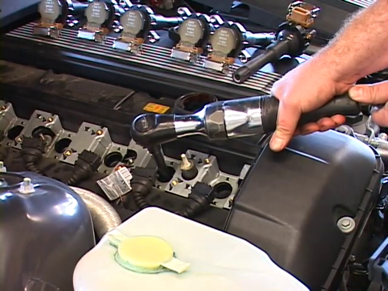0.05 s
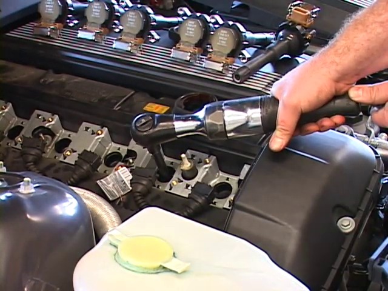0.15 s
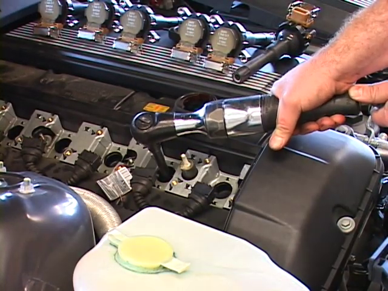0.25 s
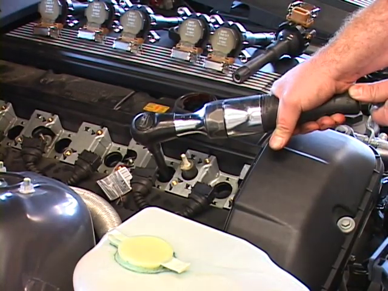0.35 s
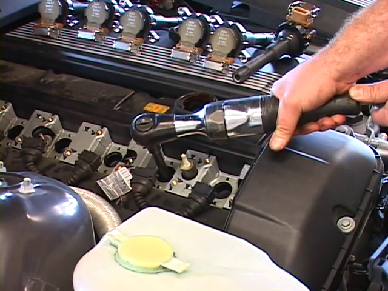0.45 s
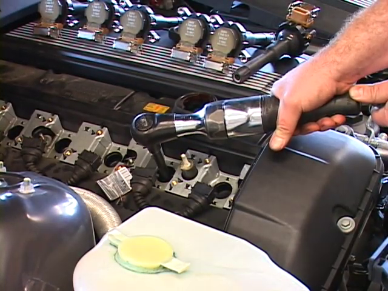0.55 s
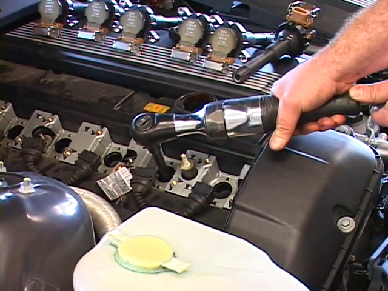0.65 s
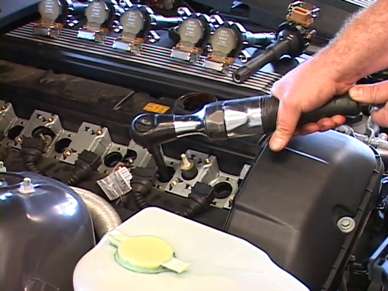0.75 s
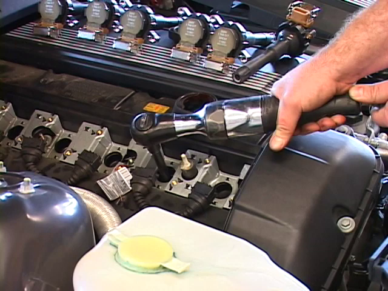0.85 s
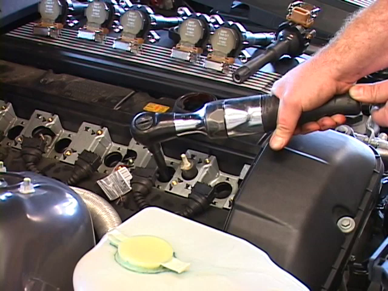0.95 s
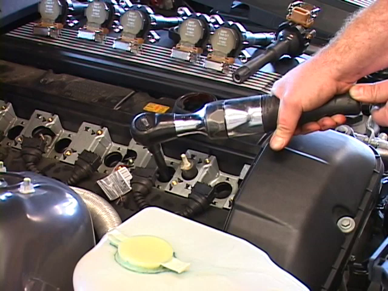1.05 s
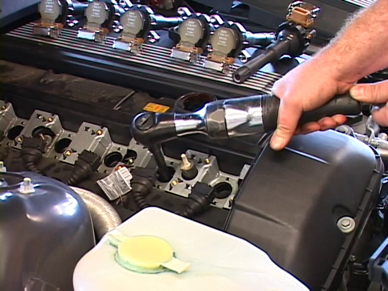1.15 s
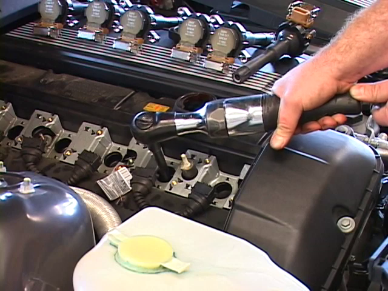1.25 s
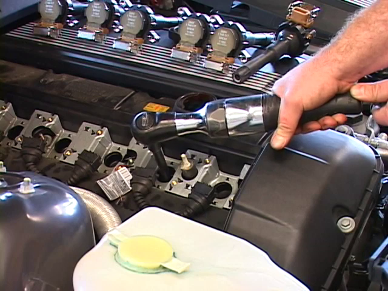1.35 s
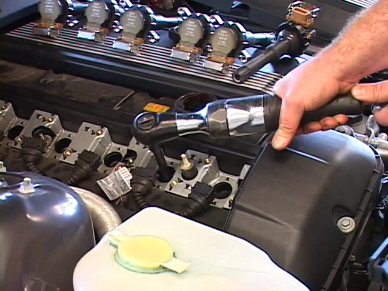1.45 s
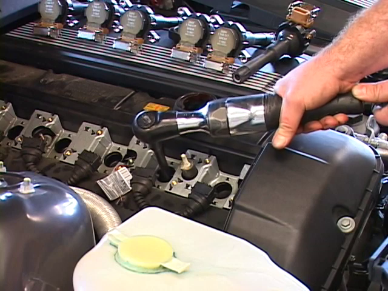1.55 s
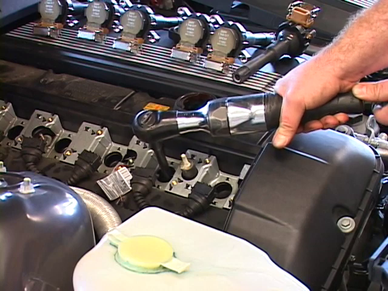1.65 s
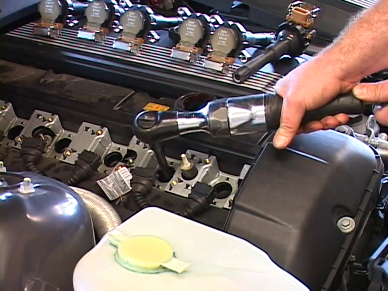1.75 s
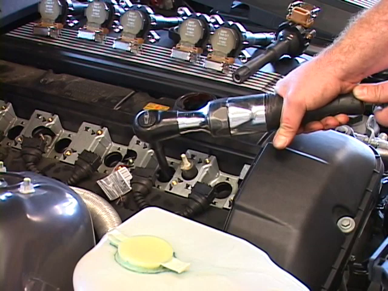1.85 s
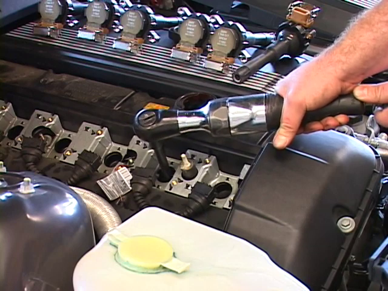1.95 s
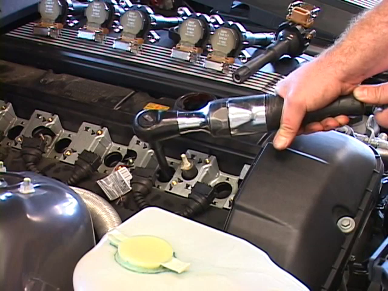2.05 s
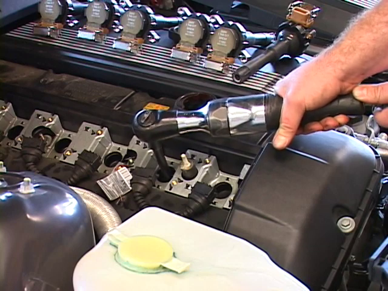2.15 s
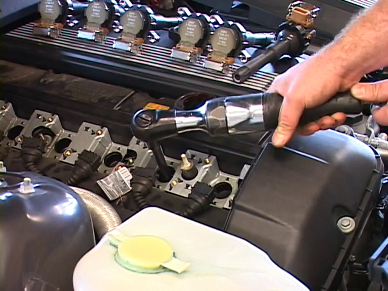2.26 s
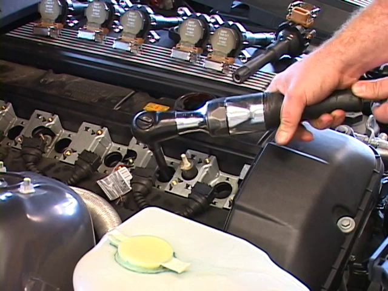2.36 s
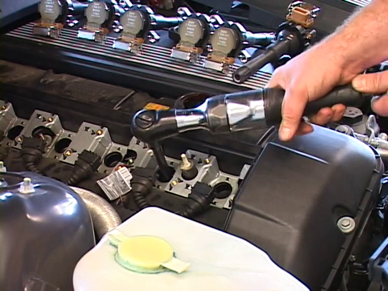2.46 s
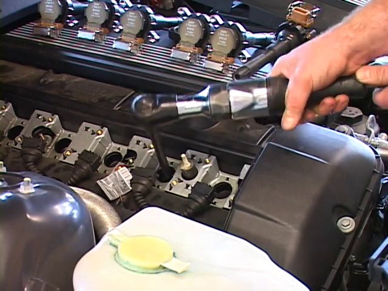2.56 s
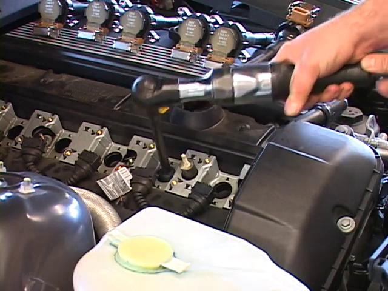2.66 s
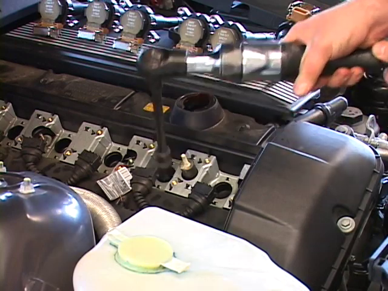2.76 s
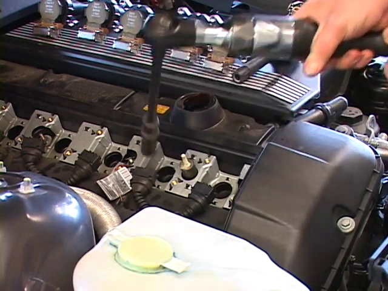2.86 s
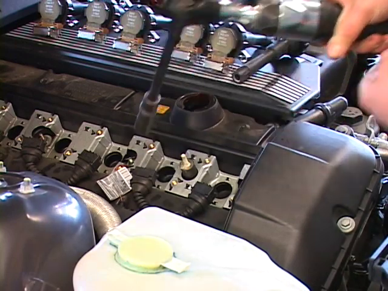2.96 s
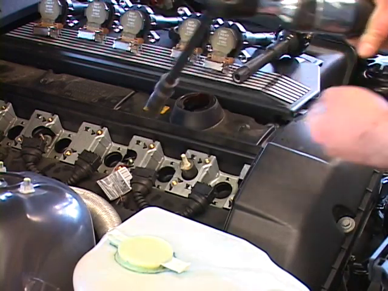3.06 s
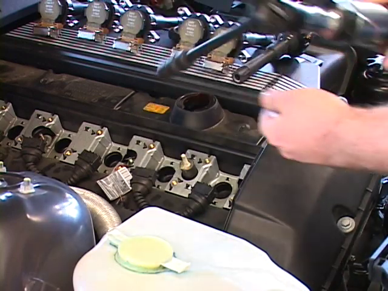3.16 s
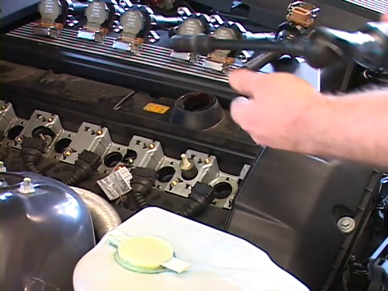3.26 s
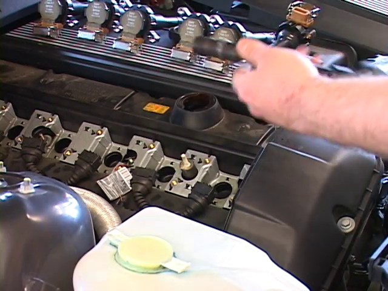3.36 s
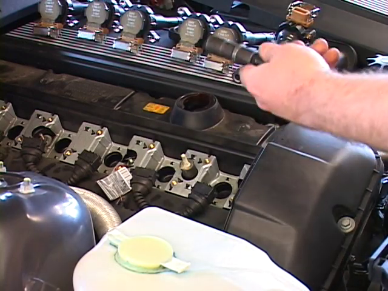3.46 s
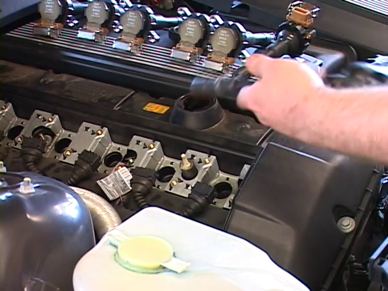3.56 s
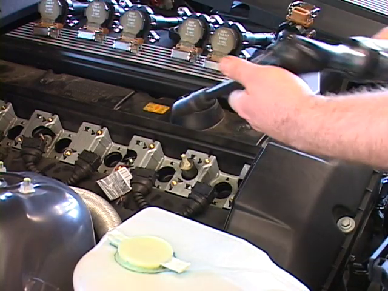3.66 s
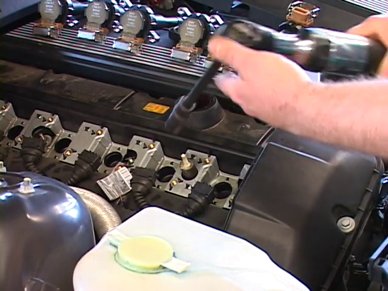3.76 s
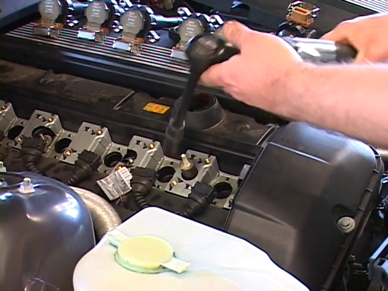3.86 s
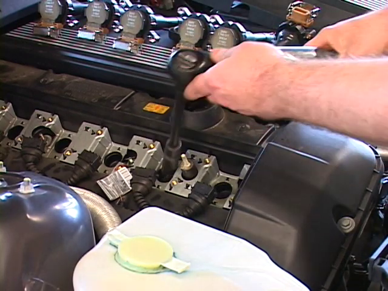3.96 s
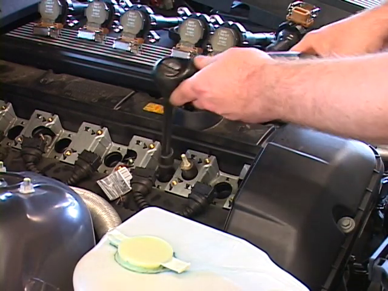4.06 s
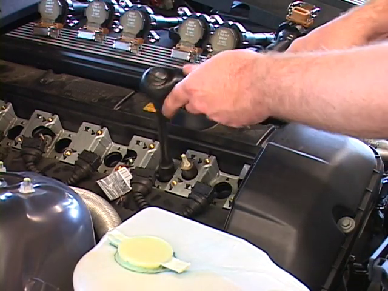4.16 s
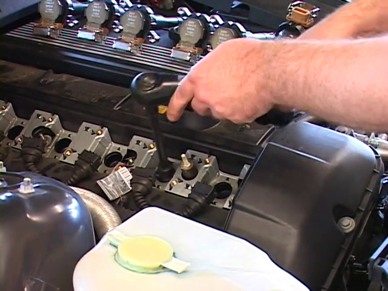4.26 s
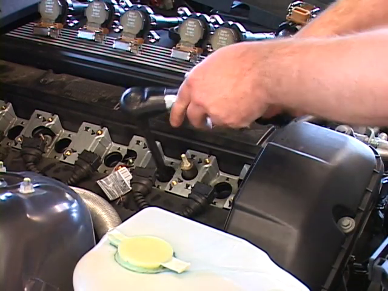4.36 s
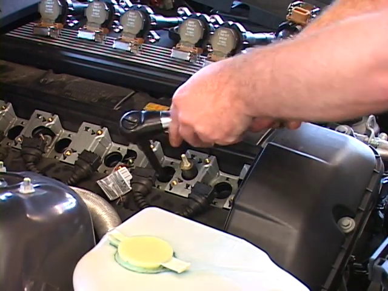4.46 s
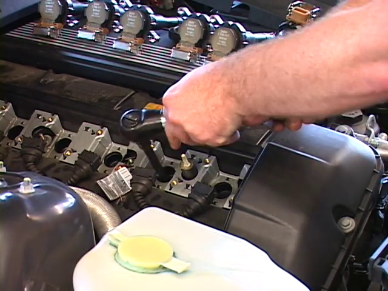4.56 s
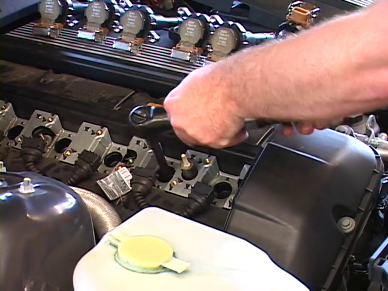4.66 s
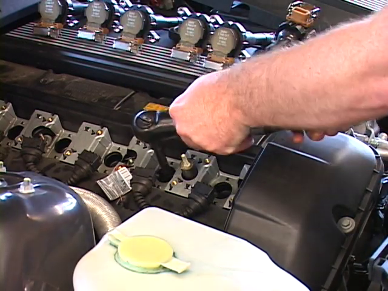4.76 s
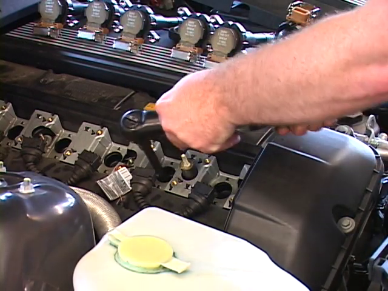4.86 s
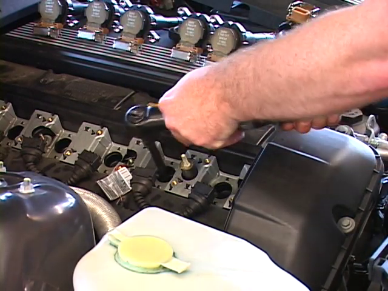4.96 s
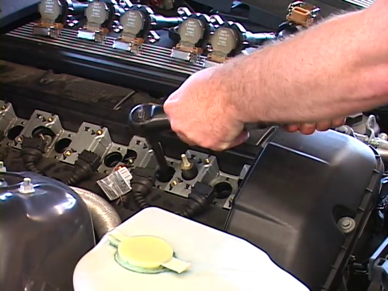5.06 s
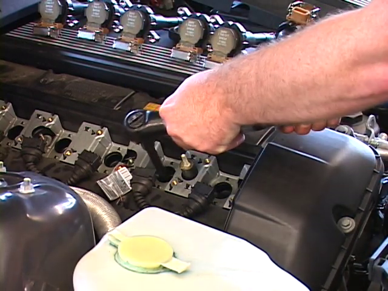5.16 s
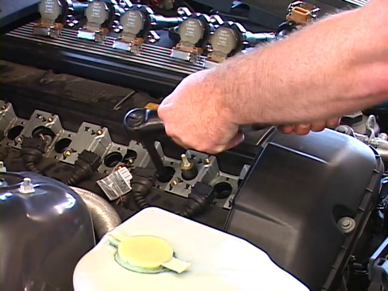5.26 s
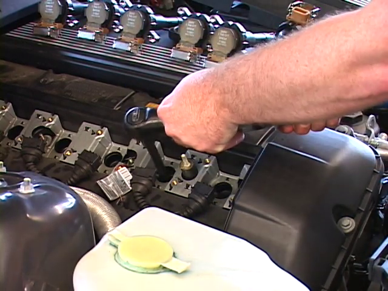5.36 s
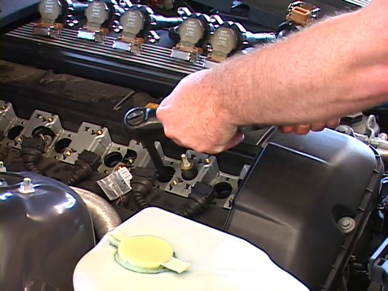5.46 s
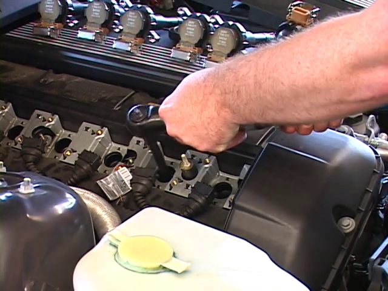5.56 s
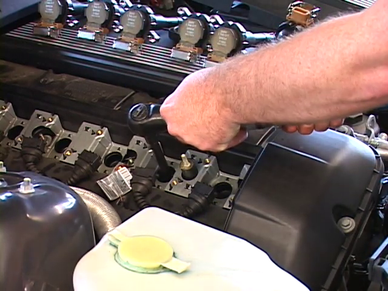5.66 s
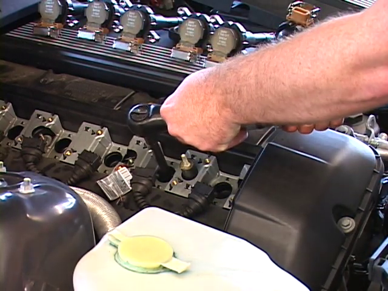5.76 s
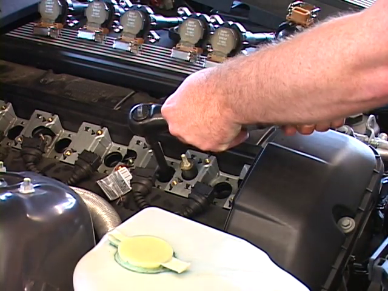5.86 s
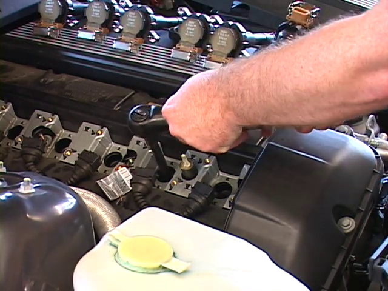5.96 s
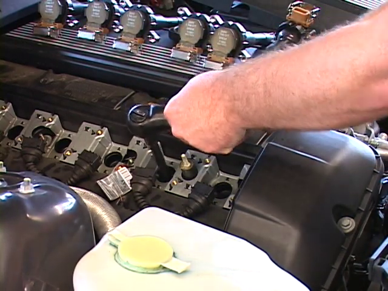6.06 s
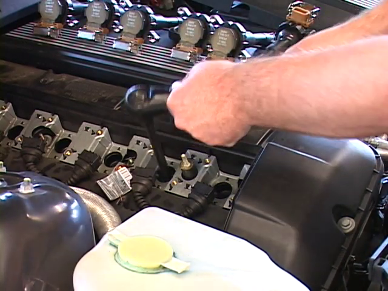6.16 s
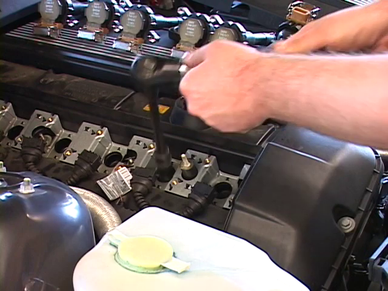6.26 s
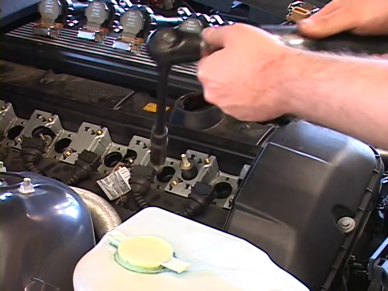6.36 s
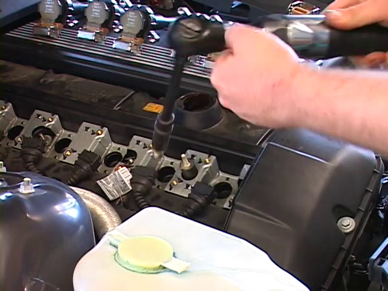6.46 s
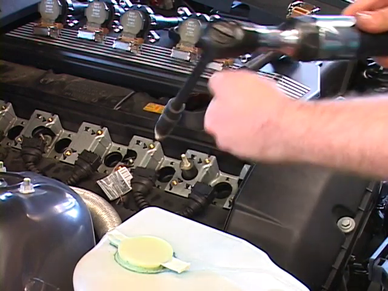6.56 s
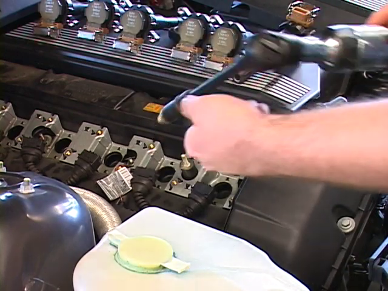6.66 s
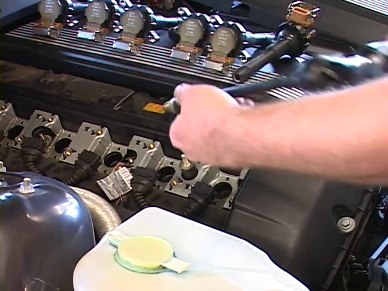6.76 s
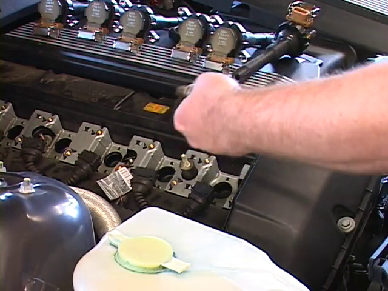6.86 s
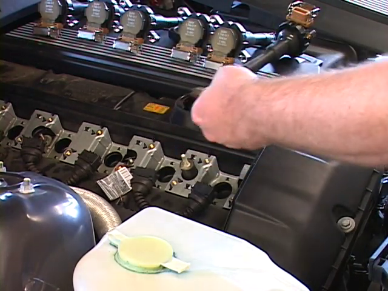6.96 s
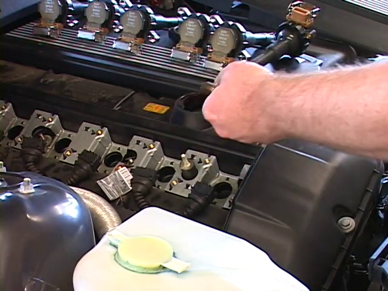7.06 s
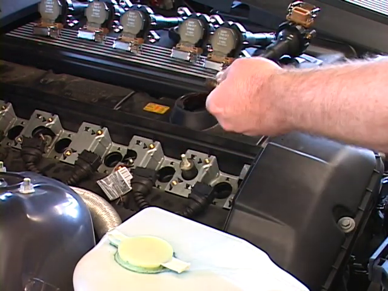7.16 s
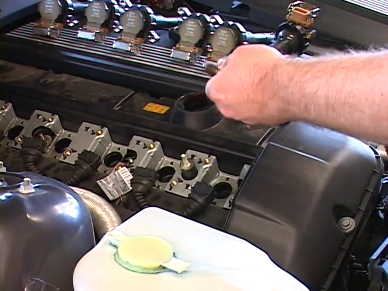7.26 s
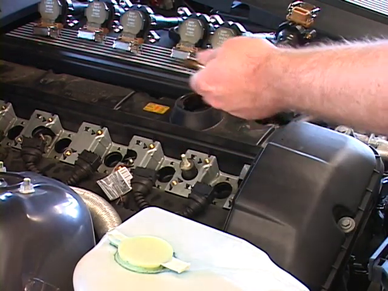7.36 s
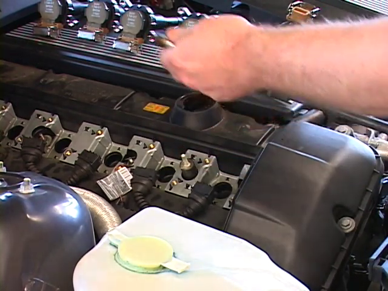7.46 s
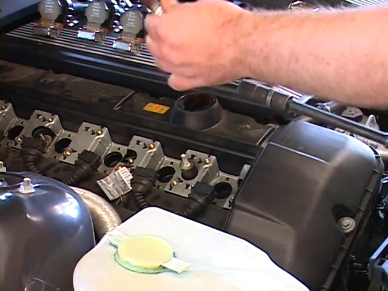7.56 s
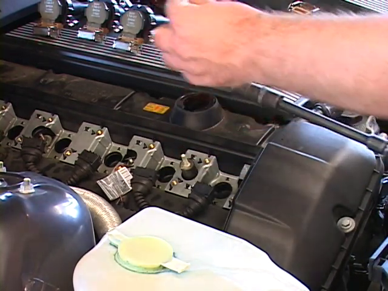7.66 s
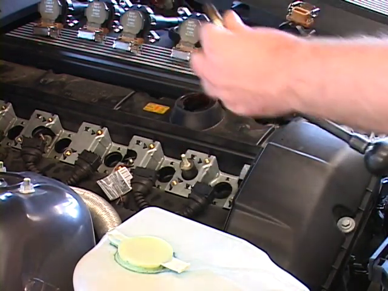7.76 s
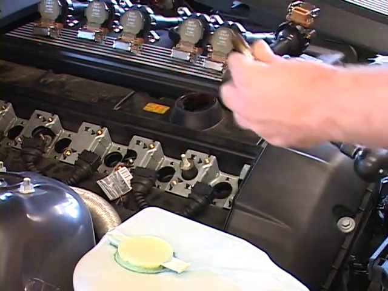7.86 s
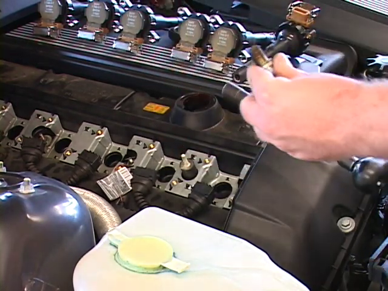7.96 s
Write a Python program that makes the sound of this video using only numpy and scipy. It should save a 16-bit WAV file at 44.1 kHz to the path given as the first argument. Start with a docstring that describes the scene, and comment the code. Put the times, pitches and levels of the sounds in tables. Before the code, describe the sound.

An air ratchet is running close by from the start, a high, slightly wavering whine over a loud hiss of exhaust air, with a short garage reverberation. At about 2.3 seconds it stops with a brief chug, its whine hanging in the room for a moment. Further off, a compressor hums up beneath it and, from about 1.5 seconds, pumps with a low, even pulse, about twelve beats a second, over a soft airy rush that lasts to the end. The steel socket clicks lightly twice just before 3 seconds, then several times between 4 and 4.5 seconds, with dull knocks near 4.4 and 4.9 as it seats. At 5 seconds the ratchet spins up again, its pitch overshooting and settling, and coasts down at about 6 seconds. A few metal clicks follow around 6.3 seconds and a faint one near 7.5, while the compressor keeps pulsing.

```python
"""Air ratchet on a spark plug

An air ratchet spins a spark plug out in two bursts: its vane motor whines over hissing exhaust, then
chugs as it coasts down. The steel socket clicks and knocks as it is handled. Further off in the garage
a compressor runs up and pumps about twelve times a second; gain control ducks it while the tool runs."""
import sys
import numpy as np
from scipy import signal
from scipy.fft import rfft, irfft, next_fast_len
from scipy.io import wavfile
from scipy.ndimage import uniform_filter1d, map_coordinates

SR = 44100
rng = np.random.default_rng(int(sys.argv[2]) if len(sys.argv) > 2 else 0)


def log_audio(samples):
    """Write samples as a 16-bit WAV file to the path given in sys.argv[1]."""
    # one column per channel
    frames = np.atleast_2d(samples).T
    # limit to full scale, then quantise
    limited = np.clip(frames, -1, 1)
    pcm = np.round(limited * 32767).astype(np.int16)
    wavfile.write(sys.argv[1], SR, pcm)


N = 353285
T = np.arange(N) / SR


def amp(db):
    """Decibels to gain."""
    return np.exp(np.asarray(db) * (np.log(10) / 20))


def unit(x):
    """Scale to rms 1."""
    return x / np.sqrt(np.mean(x ** 2) + 1e-20)


def pan(db):
    """Stereo gains that favour the left by db."""
    return amp(np.array([[db], [-db]]) / 2)


def along(points, hz):
    """Read (Hz, value) points on a log frequency axis."""
    freqs, values = np.transpose(points)
    return np.interp(np.log(hz + 1), np.log(freqs + 1), values)


def curves(rows):
    """One automation curve for each column after the time."""
    times, *columns = np.transpose(rows)
    return [np.interp(T, times, column) for column in columns]


def wobble(rate):
    """A smooth random curve, rate knots a second."""
    coarse = T[::32]
    knots = rng.standard_normal(int(N * rate / SR) + 4)
    return np.interp(T, coarse, map_coordinates(knots, [coarse * rate]))


def filtered(x, response):
    """Equalise x with a gain given as a function of Hz."""
    size = x.shape[-1]
    padded = next_fast_len(size + 4096)
    return irfft(rfft(x, padded) * response(np.fft.rfftfreq(padded, 1 / SR)), padded)[..., :size]


def rush(spectrum, likeness):
    """Stereo noise of rms 1 from (Hz, dB) and (Hz, left-right correlation) points."""
    def response(hz):
        width = np.arccos(np.clip(along(likeness, hz), -1, 1)) / 2
        return amp(along(spectrum, hz)) * [np.cos(width), np.sin(width)]
    mid, side = filtered(rng.standard_normal((2, N)), response)
    return unit(np.array([mid + side, mid - side]))


def ring(modes, t, scatter_db=0):
    """Damped modes, optionally struck with new strengths each time."""
    return sum(amp(db + scatter_db * rng.standard_normal() - 60 * t / t60) * np.sin(2 * np.pi * hz * t)
               for hz, db, t60 in modes)


def add(track, start_s, sound):
    """Mix a sound into a track."""
    part = track[round(start_s * SR):][:len(sound)]
    part += sound[:len(part)]


# The garage's reverb. Each row: frequency in Hz, seconds to fall 60 dB.
GARAGE_DECAY = [(150, 0.58), (700, 0.83), (1000, 1), (2000, 1), (5000, 0.77), (9000, 0.44), (15000, 0.2)]

def garage(x, wet_db):
    """A sound plus the room's diffuse tail, narrow in the bass and wider on top."""
    hz, t, noise = signal.stft(rng.standard_normal((2, SR)), SR, nperseg=256)
    decay = amp(-60 * t / along(GARAGE_DECAY, hz)[:, None])
    fading = noise * decay / np.linalg.norm(decay, axis=1, keepdims=True)
    mid, side = signal.istft(fading, SR, nperseg=256)[1] / np.sqrt(128)
    side = filtered(side, lambda f: along([(200, .2), (1000, .5), (4000, .68)], f))
    tail = np.array([mid + side, mid - side]) / np.sqrt(2)
    return x + amp(wet_db) * signal.fftconvolve(np.atleast_2d(x), tail, axes=1)[:, :N]


# The colour of the compressor's rush. Each row: frequency in Hz, relative level in dB.
BED_COLOUR = [(350, -8), (600, -7), (785, -5.5), (923, -9), (1830, -7.5), (2070, -11.5), (2790, -12.5),
              (4650, -14.5), (7860, -27.5), (12400, -41), (15000, -78)]
# Its fader. Each row: time in seconds, level in dB.
BED_FADER = [(0, -51), (1.3, -29), (2.8, -33), (4, -31), (5, -29), (6.6, -30), (8, -30)]

def compressor_bed():
    """The compressor's airy rush swells in over a steady rumble."""
    air = amp(curves(BED_FADER)[0]) * rush(BED_COLOUR, [(600, .82), (2000, .22), (6000, .033)])
    rumble = rush([(20, -14), (60, -5), (200, -7), (350, 0), (500, -5), (700, -3), (1500, -28),
                   (4000, -120)], [(50, .5), (150, .8), (700, .8)])
    return air + amp(-42) * rumble


# The compressor's run-up. Each row: time in seconds, pitch in Hz, level in dB.
MOTOR_RUN_UP = [(0, 69.6, -31), (.5, 76.8, -34), (1, 84.5, -37.5), (1.4, 93, -45), (1.9, 97, -60),
                (2.2, 96, -100)]

def motor_hum():
    """The motor's hum and its octave climb and fade as it gains speed."""
    hz, db = curves(MOTOR_RUN_UP)
    phase = 2 * np.pi * np.cumsum(hz) / SR
    return amp(db + 1.8 * wobble(8.1)) * (np.sin(phase) + amp(.5) * np.sin(2 * phase))


def relief_valve(peak_s=1.527, rise_s=.076, fade_db_per_s=40):
    """A breathy hoot as the relief valve closes."""
    rise = np.exp(-(np.minimum(T - peak_s, 0) / rise_s) ** 2)
    fade = amp(-21.5 - fade_db_per_s * np.maximum(T - peak_s, 0))
    colour = [(50, -21), (110, -11), (200, -17), (280, -20), (370, .5), (470, -21), (900, -40),
              (3000, -120)]
    return rise * fade * rush(colour, [(400, .93)])


def pump_stroke(t, thump_db, flutter_db, reed_hz=470, thump_s=.0026, flutter_s=.0034, lead_s=.00325):
    """One gulp of the piston; the reed valve flutters just before it shuts."""
    u = t / thump_s
    thump = -u * np.exp(-u ** 2 / 2)
    flutter = np.exp(-((t + lead_s) / flutter_s) ** 2) * np.cos(2 * np.pi * reed_hz * (t + lead_s))
    return amp(thump_db - 18) * thump + amp(flutter_db - 28) * flutter


# Slaps off the walls. Each row: delay in seconds, thump and flutter in dB against the direct stroke.
WALL_ECHOES = [(.0095, -4.5, -19), (0.0185, -9.5, 0), (0.0407, -7, -6.5), (.052, -40, -2.5)]
# The air tank's ring. Each row: pitch in Hz, relative level in dB, seconds to fall 60 dB.
TANK_MODES = [(49.7, -61, 0.17), (98.8, -36.5, 0.35), (114.4, -30.5, 0.21), (143.9, -46.5, 0.64),
              (170.5, -36.5, 0.17), (213.5, -45, 0.67), (261.3, -35, 0.25), (286.2, -43, 0.88),
              (332.5, -33.5, 0.19), (354.5, -36.5, 1), (382.7, -38.5, 0.61), (415, -40, 0.43),
              (492.2, -36, 0.26), (566, -51, 0.21), (607, -38.5, 0.31), (758, -43.5, 0.34)]
# The pump taking load. Each row: time in seconds, gain in dB.
PUMP_LOAD = [(1.25, -48), (1.42, -6), (1.6, 0.5), (1.9, -1), (5, -0.5), (8, -0.5)]

def pump(strokes_per_s=11.9928, downbeat_s=2.6011):
    """Even piston strokes echo off the walls and set the tank ringing."""
    t = np.arange(-SR // 20, SR // 2) / SR
    echoes = sum(pump_stroke(t - delay, thump, flutter) for delay, thump, flutter in WALL_ECHOES)
    stroke = pump_stroke(t, 0, 0) + echoes + amp(3.5) * ring(TANK_MODES, np.maximum(t, 0))
    strokes, period = np.zeros(N), 1 / strokes_per_s
    for start in np.arange(1 + downbeat_s % period, T[-1], period):
        add(strokes, start + t[0], stroke)
    low_cut = lambda hz: amp(along([(10, -30), (24, -11), (36, -.5), (48, .5)], hz))
    return amp(curves(PUMP_LOAD)[0]) * filtered(strokes, low_cut)


def compressor():
    """The whole machine, with a touch of room on motor and pump."""
    machine = motor_hum() + pump()
    air = relief_valve() + compressor_bed()
    return garage(machine, wet_db=-16) + air


# Steel on steel. Each row: start in seconds, relative level in dB, tone centre in Hz, rebound in dB
# against the first hit.
SOCKET_HITS = [(2.648, -20, 4930, -14), (2.852, -10.5, 5460, -20), (4.018, -20, 4450, -6),
               (4.1101, -18.5, 5110, -20), (4.2405, -21, 6060, 5.5), (4.4362, -24, 4330, -8),
               (4.481, -16.5, 5270, -4), (4.5092, -4.5, 7500, -4.5), (6.255, -16.5, 5650, 4.5),
               (6.3199, -11.5, 4030, -20), (6.425, -28.5, 8390, -15), (7.4543, -21, 4830, -6),
               (7.463, -23, 12700, 0)]
# The ring of socket and extension. Each row: pitch in Hz, relative level in dB, seconds to fall 60 dB.
STEEL_MODES = [(2614, 14, 0.067), (4000, -14, .04), (4480, -6, 0.044), (5530, 8, 0.1), (6700, 8, 0.11),
               (7200, -10, 0.13), (8200, -25, .1), (12400, -14, 0.14), (12750, -14, 0.12)]

def socket_clicks(rebound_s=.0125):
    """The loose socket clacks, strikes back and rings briefly."""
    t = np.arange(SR // 4) / SR
    clicks = np.zeros(N)
    body_eq = [(300, -27.5), (1200, 12), (2700, 3), (8000, 1.5), (10500, -9), (12700, -2.5), (14500, -26)]
    attack = 1 - np.exp(-t / .0013)
    chatter = amp(-60 * np.maximum(t - .002, 0) / .025)  # the joint rattles for 2 ms, then dies away
    for start, db, centre_hz, rebound_db in SOCKET_HITS:
        def colour(hz):
            return amp(along(body_eq, hz)) / np.sqrt(1 + (1.9 * np.log2((hz + 1) / centre_hz)) ** 2)
        for at, hit_db in [(start, db), (start + rebound_s, db + rebound_db)]:
            crack = unit(filtered(rng.standard_normal(len(t)), colour)) * chatter
            chime = amp(-31) * ring(STEEL_MODES, t, scatter_db=4)
            add(clicks, at, amp(hit_db) * (crack + chime) * attack)
    return clicks


# The socket seating. Each row: start in seconds, relative level in dB.
SEATING_HITS = [(4.352, -9.5), (4.942, -18), (4.950, -6.5)]
# The plug well's hollow tone. Each row: pitch in Hz, relative level in dB, seconds to fall 60 dB.
WELL_MODES = [(305, -1, 0.05), (444, -23, 0.02), (590, -1, 0.03), (755, 4.5, 0.046), (903, 3, 0.032),
              (1090, -4, 0.033)]

def socket_knocks():
    """The socket knocks dully as it seats in the plug well."""
    t = np.arange(SR // 4) / SR
    knocks = np.zeros(N)
    attack = 1 - np.exp(-t / .00091)
    for start, db in SEATING_HITS:
        add(knocks, start, amp(db - 5.5) * ring(WELL_MODES, t, scatter_db=1.5) * attack)
    return knocks


# The whine left in the room. Each row: harmonic number, relative level in dB, seconds to fall 60 dB.
ROOM_PARTIALS = [(1, -13, 1.0), (2, -21, 1), (3, -37, .6)]

def after_ring(since, cruise_hz, beat_s, onset_s=.023, beat_depth=.65):
    """After a stop the room holds the whine for a moment, swelling as its standing waves beat."""
    phase = 2 * np.pi * np.cumsum(cruise_hz * (1 + .0016 * wobble(30))) / SR
    swell = (1 - np.exp(-since / onset_s)) * (1 + beat_depth * np.cos(2 * np.pi * since / beat_s))
    return swell * sum(amp(db - 60 * since / t60) * np.sin(round(k) * phase)
                       for k, db, t60 in ROOM_PARTIALS)


# The exhaust's colour. Each row: frequency in Hz, relative level in dB.
EXHAUST_COLOUR = [(100, -34), (300, -23), (700, -11.5), (1500, -9), (2100, -1.5), (2600, -2), (3100, 1),
                  (3500, -2.5), (4800, 1), (5800, -1.5), (6900, 3), (9000, -.5), (11000, -7),
                  (15000, -12.5)]
# Its stereo image. Each row: frequency in Hz, left-right correlation.
EXHAUST_IMAGE = [(150, .9), (550, .85), (1650, .62), (5000, .5), (15000, .5)]

def hiss(vane, air):
    """Exhaust air, fluttering at the vane rate."""
    flutter = 1 + .3 * np.sin(vane)
    return air * amp(-5 + .6 * wobble(14)) * flutter * rush(EXHAUST_COLOUR, EXHAUST_IMAGE)


def puffs(vane, strength):
    """Each slow pulse blows through the exhaust port's resonance."""
    port = [(40, -38), (150, -24), (500, -1), (1200, 1), (2050, 16), (2900, 4), (6000, -23), (15000, -58)]
    return strength * amp(1.5) * (1 + .8 * np.sin(vane)) * rush(port, EXHAUST_IMAGE)


def chug(vane, strength):
    """A slow rotor lets the air out in separate, uneven pulses."""
    uneven = vane + .3 * wobble(350)
    pulses = np.sin(uneven) + amp(-6) * np.sin(2 * uneven) + amp(-11.5) * np.sin(3 * uneven)
    return strength * amp(2 + 1.73 * wobble(250)) * pulses * np.ones((2, 1))


# The chug under power, then coasting. Each row: share of full speed, relative level in dB.
CHUG_POWERED = [(.05, -44), (.2, -20.5), (.45, -11), (.8, -15), (.93, -15), (1, -50)]
CHUG_COASTING = [(.05, -60), (.14, -38), (.27, -21.5), (.5, -10.5), (.8, -4), (.93, -13), (1, -52)]

def chug_strength(speed, trigger_held):
    """The pulses stand out at part speed and all but vanish at full speed."""
    powered_db = np.interp(speed, *np.transpose(CHUG_POWERED))
    coasting_db = np.interp(speed, *np.transpose(CHUG_COASTING))
    return amp(np.where(trigger_held, powered_db, coasting_db)) * np.minimum(20 * speed, 1)


# The gears' side tones. Each row: multiple of the ratchet's stroke rate, relative level in dB.
GEAR_TONES = [(7, -52), (8, -50.5), (9, -57), (15, -42), (17, -56), (18, -44), (29, -43.5), (31, -36.5),
              (36, -35.5), (46, -39), (48, -30), (60, -42.5), (64, -34), (76, -36)]

def whine(vane, root_db, octave_db, root_pan, octave_pan, lead_rad=.37, vanes_per_stroke=16):
    """Vanes chop the air into two partials, wavering and out of step at the ears; gears sing along."""
    ears = vane + np.array([[lead_rad], [-lead_rad]])
    waver_db = 2.2 * np.array([wobble(9), wobble(9)])
    root = amp(root_db + waver_db + 1.2 * wobble(55)) * np.sin(ears) * pan(root_pan)
    octave = amp(octave_db + .71 * wobble(55)) * np.sin(vane + ears) * pan(octave_pan)
    stroke = (vane / vanes_per_stroke).astype(np.float32)
    gears = sum(amp(db) * (1 + .37 * wobble(25)) * np.sin(round(k) * stroke) for k, db in GEAR_TONES)
    return amp(12.5) * (root + octave + gears)


# Trigger pulls. Each row: press and release in seconds, cruising vane rate and overshoot in Hz, air gain
# in dB, its sag in dB per second, a moment in seconds when the plug turns most freely, the whine's root
# and octave in relative dB, their leftward pans in dB, after-ring beat in seconds, after-ring gain in dB.
TRIGGER_PULLS = [(-.2, 2.284, 1020, 6.05, 11.5, 5.5, 0.209, -24.5, -22.5, 0, 5.5, 0.3, -0.5),
                 (4.986, 5.953, 1022, 135, 1.45, 4.2, 5.36, -22, -14.5, -3, 1, 0.201, 4)]

def ratchet(spin_up_s=.061, settle_s=.29, coast_s=.035, open_s=.054, shut_db_per_s=298,
            plug_turn_s=.333, port_hz=2025, port_width_hz=130):
    """Each pull opens the air valve: the rotor spins up, overshoots, settles, and coasts on release."""
    stems = np.zeros((4, 2, N))
    for (pressed, released, cruise_hz, overshoot_hz, air_db, sag, free_at,
         root_db, octave_db, root_pan, octave_pan, beat_s, after_db) in TRIGGER_PULLS:
        age, since = np.maximum(T - pressed, 0), np.maximum(T - released, 0)
        speed = (1 - np.exp(-(age / spin_up_s) ** 2)) / (1 + (since / coast_s) ** 2)
        # the thread drags once a turn, swaying the pitch and the root's level
        sway = np.cos(2 * np.pi * (T - free_at) / plug_turn_s)
        vane_hz = speed * (cruise_hz + overshoot_hz / (1 + (age / settle_s) ** 4) + 3.1 * sway)
        vane = 2 * np.pi * np.cumsum(vane_hz * (1 + .0013 * wobble(40))) / SR  # phase in radians
        opening = 1 - np.exp(-(age / open_s) ** 2)
        air = opening * amp(air_db - sag * age - np.minimum(shut_db_per_s * since, 200))
        # the exhaust port's resonance favours the octave at cruising speed
        port_db = -10 * np.log10(1 + np.minimum(((2 * vane_hz - port_hz) / port_width_hz) ** 2, 6))
        tone = whine(vane, root_db + 4 * sway, octave_db + port_db, root_pan, octave_pan)
        pulsing = chug_strength(speed, T < released)
        diffuse = puffs(vane, air * pulsing) + amp(after_db) * after_ring(since, cruise_hz, beat_s)
        stems += np.array([air * speed ** 2 * tone, chug(vane, pulsing), hiss(vane, air), diffuse])
    tones, chugs, hisses, diffuse = stems
    motor = garage(tones, wet_db=-11) + garage(chugs, wet_db=4)
    return motor + garage(hisses, wet_db=-3) * pan(.9) + diffuse


def scene():
    """The tool and its socket close by, the compressor behind."""
    tool, clicks, knocks = ratchet(), socket_clicks(), socket_knocks()
    socket = garage(knocks, wet_db=-3) + garage(clicks, wet_db=-5)
    return tool + socket + compressor() * pan(.55)


def record(dry, threshold_db=-12.6, release_s=1.3, top_hz=15200):
    """Gain control ducks fast on loud treble and recovers slowly; peaks clip and the very top is cut."""
    treble = signal.sosfilt(signal.butter(4, 2600, "high", fs=SR, output="sos"), dry)
    power = uniform_filter1d(np.mean(treble ** 2, axis=0), size=1800)
    excess_db = np.maximum(10 * np.log10(np.abs(power) + 1e-12) - threshold_db, 0)
    recovery = np.exp(-T / release_s)
    duck_db = recovery * np.maximum.accumulate(excess_db / recovery)
    low_pass = lambda hz: np.clip((top_hz - hz) / 400 + .5, 0, 1)
    return filtered(np.clip(dry * amp(-duck_db), -1, 1), low_pass)


dry = scene()
out = record(dry)
log_audio(out)
```